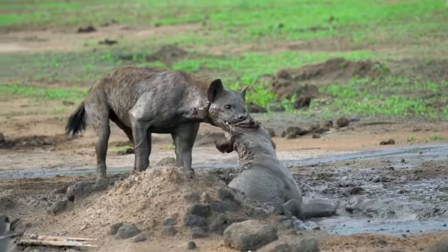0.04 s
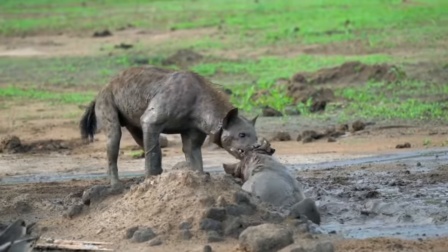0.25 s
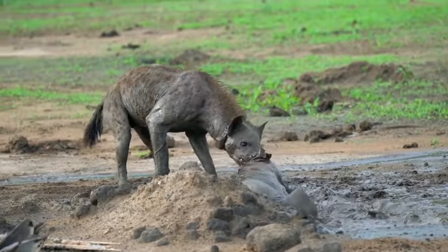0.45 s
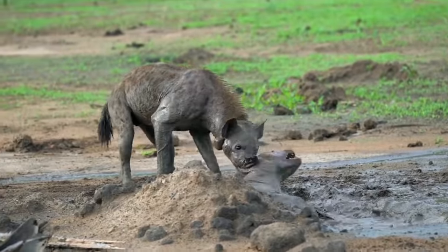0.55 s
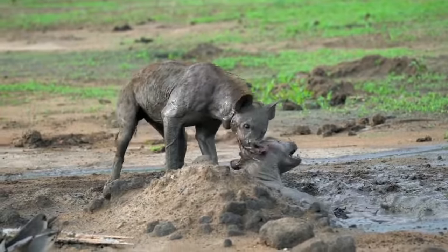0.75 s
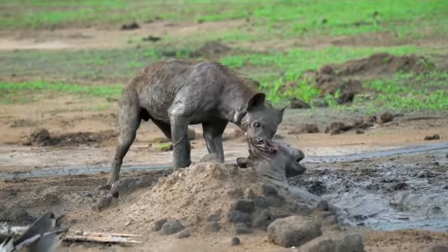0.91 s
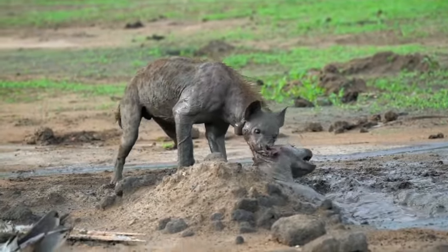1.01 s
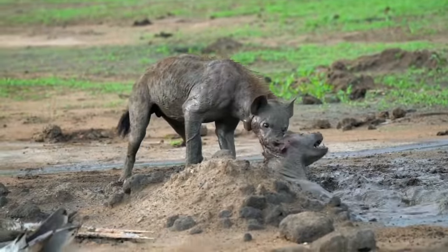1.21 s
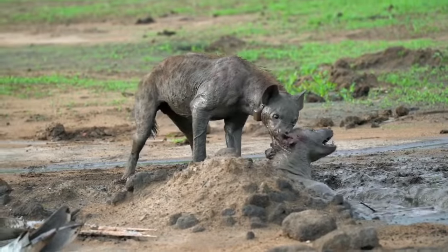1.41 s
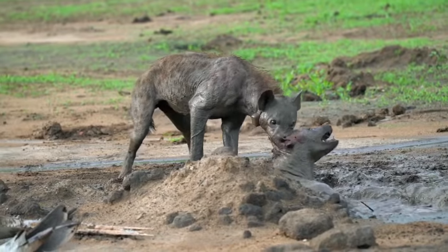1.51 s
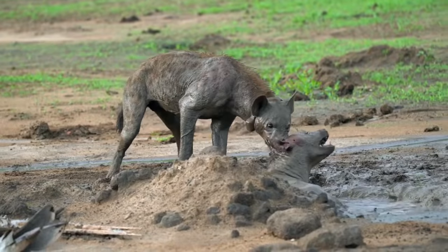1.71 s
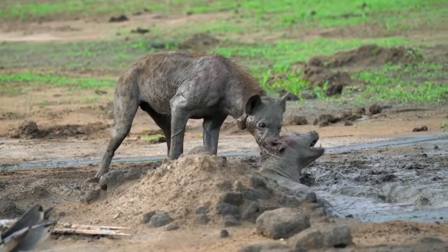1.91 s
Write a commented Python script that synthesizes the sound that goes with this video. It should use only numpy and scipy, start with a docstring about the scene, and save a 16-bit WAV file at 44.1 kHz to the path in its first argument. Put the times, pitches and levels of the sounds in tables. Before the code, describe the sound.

One low, raspy hyena moan outdoors, with soft mud squelches and faint bird chirps.

```python
"""A hyena groans as two fight in a mud wallow: a creak tightens into a snarl, drops an octave into a
full moan and sags into a rattle. Its vocal folds ring the chest, throat and mouth while breath rasps
between its teeth; a soft grunt follows. Mud squelches under them in swells of noise. A small bird
repeats a two-note chirp, another whistles far off, and insects hiss over the open ground."""
import sys
import numpy as np
from scipy import signal
from scipy.fft import rfft, irfft
from scipy.io import wavfile
from scipy.ndimage import uniform_filter1d

SR = 44100
rng = np.random.default_rng(int(sys.argv[2]) if len(sys.argv) > 2 else 0)


def put_to_file(sound):
    """Save the sound as 16-bit audio at rate SR, in the file named by the first command-line argument."""
    columns = np.atleast_2d(sound).T  # one column per channel
    safe = np.clip(columns, -1, 1)
    whole_steps = np.round(safe * 32767)
    wavfile.write(sys.argv[1], SR, whole_steps.astype(np.int16))


N = 85995
T = np.arange(N) / SR

# The groan's melody, as the rate of the folds' slow cycle: time_s, pitch_hz
GROAN_PITCH = [(.03, 55), (.15, 60), (.19, 74), (.268, 81.5), (.36, 88), (.428, 87.5), (.485, 90),
               (.52, 99), (.572, 112.5), (.635, 116.8), (.69, 113.4), (.836, 111.7), (.944, 117.3),
               (1.054, 118.5), (1.224, 115.1), (1.32, 109.5), (1.4, 90), (1.49, 68)]
def hyena(air_db=-36, rough_air_db=-9):
    """Fold closures and puffs of breath make one buzz that feeds both the voice and the rasp."""
    cycles = np.cumsum(curves(GROAN_PITCH)[0] * waver(.002)) / SR
    roughness = curves(FOLD_TEXTURE)[2]
    puffing = 1 + np.exp(-2 * (cycles % 1))
    breath, mid_air, side_air = unit_rms(puffing * rng.standard_normal((3, N)))
    buzz = steady(fold_closures(cycles)) + (amp(air_db) + amp(rough_air_db) * roughness) * breath
    buzz = signal.sosfilt(signal.butter(3, 185, "high", fs=SR, output="sos"), buzz)
    thrum = note(start_s=.52, length_s=.17, from_hz=110, to_hz=110, db=-44)  # under the octave drop
    voice = (vocal_tract(buzz) + creaks()) * gate(VOICE_LEVELS) + thrum
    return pan(voice, db=-.76) + pan(teeth_rasp(buzz, mid_air, side_air), db=-2.2)


# The grain of the voice: time_s, second_closure_gain, second_closure_place_cycles, roughness_ratio
FOLD_TEXTURE = [(.16, .7, .48, .9), (.19, 1, .5, .15), (.28, .9, .5, .15), (.3, .3, .5, .7),
                (.34, .25, .49, .15), (.47, .4, .5, .09), (.53, .2, .45, .25), (.6, .1, .4, .06),
                (1.22, .1, .4, .02), (1.31, .25, .35, .07), (1.39, .55, .33, .09), (1.45, .35, .4, .12),
                (1.5, .4, .45, .5)]
def fold_closures(cycles, jitter_s=.0009, shimmer_db=6, count=260):
    """The folds snap shut twice a cycle; when the second closure weakens, the voice drops an octave."""
    second_gain, place, roughness = curves(FOLD_TEXTURE)
    closures = [(cycles, np.ones(N)), (cycles - place, second_gain)]
    clicks = np.zeros(N)
    for phase, gain in closures:
        late, loud = rng.standard_normal((2, count))  # rough folds close unevenly in time and strength
        at = np.interp(np.arange(count), phase, np.arange(N))
        due = at.astype(int)
        at = np.clip(at + late * roughness[due] * jitter_s * SR, 0, N - 2)
        strength = gain[due] * amp(shimmer_db * roughness[due] * loud) * (due < N - 1)
        clicks += np.bincount(at.astype(int), strength * (1 - at % 1), N)  # split over two samples
        clicks += np.bincount(at.astype(int) + 1, strength * (at % 1), N)
    return clicks


# Fader rides for the three cavities: time_s, chest_db, throat_db, mouth_db
VOICE_LEVELS = [(.035, -52, -66, -58), (.05, -42, -55, -49.5), (.165, -41, -48.5, -44),
                (.195, -36, -39, -36), (.245, -36, -34.5, -37.5), (.28, -32.5, -31.5, -30),
                (.355, -31.5, -28, -27.5), (.42, -32.5, -23, -26), (.485, -36.5, -19.5, -25.5),
                (.55, -25, -27, -26), (.635, -24.5, -25, -18.5), (.69, -26.5, -31, -22.5),
                (.755, -28.5, -35, -19), (.825, -30, -39, -24.5), (.89, -28, -42, -25.5),
                (.945, -23.5, -26.5, -21), (1.02, -24.5, -23, -26.5), (1.14, -25.5, -21.5, -21),
                (1.22, -23.5, -30.5, -21), (1.37, -28, -30, -20), (1.44, -31.5, -37, -26),
                (1.495, -33.5, -38, -27), (1.52, -54, -44, -42)]
# The shifting vowel: time_s, chest_hz, lower_mouth_hz, upper_mouth_hz, upper_over_lower_db
VOWEL = [(.1, 266, 1055, 1210, 4), (.22, 232, 880, 1090, -2), (.44, 282, 1004, 1235, -1.5),
         (.56, 368, 875, 985, -9.5), (.6, 354, 934, 1256, 0.5), (.635, 337, 900, 1144, 4.5),
         (.73, 283, 983, 1270, -9.5), (.85, 207, 900, 1193, -1), (.95, 270, 1067, 1240, -1.5),
         (1.02, 280, 1185, 1310, -4.5), (1.12, 288, 1047, 1295, 2.5), (1.22, 288, 1017, 1285, -3),
         (1.3, 265, 932, 1192, -3), (1.485, 240, 821, 1000, 1.5)]
# The throat's ring: time_s, resonance_hz
THROAT_RING = [(.485, 705), (.515, 778), (.57, 753), (.63, 706)]
# High mouth resonances that give the voice its edge: centre_hz, width_hz, gain_db
EDGE_BANDS = [(1800, 200, 0), (2095, 170, -4)]
# Fader ride for that edge: time_s, level_db
EDGE_LEVEL = [(.15, -55.5), (.46, -40), (.58, -45.5), (.75, -40), (.85, -47.5), (1.05, -37.5), (1.25, -47),
              (1.5, -46)]
def vocal_tract(buzz):
    """The softened buzz rings the chest, throat and mouth, each riding its own fader."""
    drive = signal.lfilter(*signal.butter(2, 2960, fs=SR), buzz)
    chest_db, throat_db, mouth_db = curves(VOICE_LEVELS)
    chest_hz, lower_hz, upper_hz, upper_db = curves(VOWEL)
    chest = resonate(drive, chest_hz, width_hz=216)
    pharynx = amp(1) * resonate(chest, hz=470, width_hz=87)
    throat = resonate(drive, curves(THROAT_RING)[0], width_hz=81)
    mouth = steady(resonate(drive, lower_hz, width_hz=76))
    mouth += amp(upper_db) * steady(resonate(drive, upper_hz, width_hz=122))
    palate = amp(-13) * steady(resonate(drive, hz=1483, width_hz=102))
    edge = amp(curves(EDGE_LEVEL)[0]) * steady(bank(drive, EDGE_BANDS))
    return (amp(chest_db) * steady(chest + pharynx) + amp(throat_db) * steady(throat)
            + amp(mouth_db) * steady(mouth + palate) + edge)


# Dry snaps at both ends of the groan: start_s, peak_db
CREAK_HITS = [(.063, -30), (.144, -25), (.178, -23.5), (1.487, -19)]
def creaks():
    """Single snaps of the folds ring the mouth over a low thump."""
    mouth_hz = curves(VOWEL)[1]
    snaps = np.zeros(N)
    for start_s, peak_db in CREAK_HITS:
        click = 1. * (np.arange(N) == round(start_s * SR))
        snap = resonate(click, mouth_hz, width_hz=700) + resonate(click, hz=110, width_hz=216)
        snaps += amp(peak_db) * snap / abs(snap).max()
    return snaps


# Fader ride for the rasp: time_s, level_db
RASP_LEVEL = [(.1, -85), (.35, -54), (.58, -50), (.755, -41.5), (.83, -47.5), (1.05, -42.5), (1.36, -42),
              (1.43, -49.5), (1.53, -53)]
# The colour of the bared teeth: time_s, upper_over_lower_db, lower_hz
RASP_COLOUR = [(.58, -7.5, 5620), (.74, -18.5, 5350), (.84, -1, 5730), (1.07, -1.5, 5580), (1.27, -6, 5730)]
# The rasp's upper resonance: centre_hz, width_hz, gain_db
RASP_UPPER_BAND = [(7000, 860, 0)]
def teeth_rasp(buzz, mid_air, side_air, spread=.65):
    """Puffs of air and the folds' buzz rasp and whistle between the teeth."""
    upper_db, lower_hz = curves(RASP_COLOUR)
    air = mid_air + spread * np.array([side_air, -side_air])
    voiced_air = unit_rms(air + amp(-2) * buzz)
    lower = resonate(voiced_air, lower_hz, width_hz=485)
    upper = amp(upper_db) * bank(voiced_air, RASP_UPPER_BAND)
    sizzle = amp(-17.5) * resonate(air, hz=10700, width_hz=4500)
    return unit_rms(lower + upper + sizzle) * amp(curves(RASP_LEVEL)[0]) * gate(RASP_LEVEL)


def grunt(start_s=1.54, length_s=.15, hz=155, db=-48):
    """A short closed-mouth hum after the groan: a tone and its softer octave."""
    return note(start_s, length_s, hz, hz, db) + note(start_s, length_s, 2 * hz, 2 * hz, db - 7)


# Squelches under the fight: start_s, length_s, level_db
SQUELCH_HITS = [(0.64, 0.079, -41.5), (1.376, 0.051, -40.5), (1.512, 0.27, -48.5)]
# The mud's wet colour: frequency_hz, gain_db
MUD_EQ = [(300, 4), (1400, 6.5), (10000, -4.5), (15500, -7.5)]
def mud():
    """Wet mud squelches in short swells of noise."""
    swells = sum(amp(db) * np.sin(np.pi * np.clip((T - start_s) / length_s, 0, 1))
                 for start_s, length_s, db in SQUELCH_HITS)
    return swells * noise(MUD_EQ)


# Cues for each chirp's rising note: start_s
CHIRP_CUES = [.238, .567, .892, 1.218, 1.548]
def small_bird(lead_s=.027):
    """Each chirp is a faint falling note, then a rising one, with a fast flutter in level."""
    chirps = np.zeros(N)
    for start_s in CHIRP_CUES:
        chirps += note(start_s - lead_s, length_s=.014, from_hz=3500, to_hz=2750, db=-58.5)
        chirps += note(start_s, length_s=.026, from_hz=2850, to_hz=3850, db=-54.5)
    return chirps * waver(depth=1, size=150)


def far_bird():
    """One faint, steady whistle."""
    return note(start_s=1.76, length_s=.3, from_hz=1346, to_hz=1346, db=-57)


def insects(level_db=-54.5):
    """Insects merge into one high band of hiss."""
    return amp(level_db) * unit_rms(resonate(rng.standard_normal((2, N)), hz=5940, width_hz=1350))


# The colour of the open air: frequency_hz, gain_db
HUSH_EQ = [(25, -13), (90, 5), (220, 4.5), (780, 3.5), (2100, 2), (4200, -7), (7000, -11), (15500, -18.5)]
def hush(level_db=-48.5):
    """A low, even bed of outdoor noise."""
    return amp(level_db) * noise(HUSH_EQ)


def bank_reflections(x, t60_s=.05, size=4000, low_cut_hz=1300):
    """Early reflections from the wallow's banks, opposite in the two ears and thin in the bass."""
    tail = rng.standard_normal(size) * amp(-60 * T[:size] / t60_s)
    side = signal.fftconvolve(x.mean(0), tail / np.linalg.norm(tail))[:N]
    side = signal.lfilter(*signal.butter(1, low_cut_hz, "high", fs=SR), side)
    return np.array([side, -side])


# The outdoor tail, darkening as it fades: frequency_hz, t60_s
REVERB_DECAY = [(100, 0.64), (800, 0.61), (6000, 0.081)]
def reverb(x):
    """Diffuse reflections, each band dying at its own speed."""
    white = noise([(1, 0), (SR, 0)])[:, :SR]
    hz, t, bands = signal.stft(white, SR, nperseg=256)
    decay = amp(-60 * t / at_hz(REVERB_DECAY, hz)[:, None])
    tail = signal.istft(bands * decay, SR, nperseg=256)[1]
    return signal.fftconvolve(x, tail / np.linalg.norm(tail[0]), axes=1)[:, :N]


# How alike left and right are: frequency_hz, correlation_ratio
STEREO_LIKENESS = [(250, 0.99), (1000, 0.6), (2500, 0.06)]
def noise(eq):
    """Coloured stereo noise at rms 1, centred in the bass and wide in the treble."""
    hz = np.fft.rfftfreq(N, 1 / SR)
    left, other = rfft(rng.standard_normal((2, N)))
    likeness = at_hz(STEREO_LIKENESS, hz)
    right = likeness * left + np.sqrt(1 - likeness ** 2) * other
    return unit_rms(irfft(np.array([left, right]) * amp(at_hz(eq, hz)), N))


def note(start_s, length_s, from_hz, to_hz, db):
    """A soft-edged tone, held or gliding."""
    progress = np.clip((T - start_s) / length_s, 0, 1)
    hz = from_hz + (to_hz - from_hz) * progress ** .75
    envelope = np.sqrt(2 * abs(np.sin(np.pi * progress)))
    return amp(db) * envelope * np.sin(2 * np.pi * np.cumsum(hz) / SR)


def resonate(x, hz, width_hz):
    """A steep resonance of gain 1 that can sweep."""
    carrier = np.exp(2j * np.pi * np.cumsum(hz * np.ones(N)) / SR)
    pole = np.exp(-np.pi * width_hz / SR)
    baseband = signal.lfilter([(1 - pole) ** 2], [1, -2 * pole, pole * pole], x / carrier + 1e-18)
    return 2 * (carrier * baseband).real


def bank(x, bands):
    """Several resonances side by side."""
    return sum(amp(db) * resonate(x, hz, width_hz) for hz, width_hz, db in bands)


def waver(depth, size=1500):
    """A random drift about 1, smoothed over size samples."""
    return 1 + depth * unit_rms(signal.fftconvolve(rng.standard_normal(N), np.hanning(size), "same"))


def steady(x, size=1900):
    """A leveller that holds the running rms at 1."""
    window = np.hanning(size)
    power = abs(signal.fftconvolve(x ** 2, window / window.sum(), "same"))
    return x / np.sqrt(power + 1e-4 * np.mean(x ** 2))


def curves(table):
    """One automation lane for each column after time_s."""
    times, *columns = np.transpose(table)
    return [np.interp(T, times, column) for column in columns]


def gate(table, fade_s=.016):
    """Open from a table's first row to its last."""
    return np.clip(np.minimum(T - table[0][0], table[-1][0] - T) / fade_s + 1, 0, 1)


def at_hz(points, hz):
    """Reads a curve on a log-frequency axis."""
    point_hz, values = np.transpose(points)
    return np.interp(np.log(hz + 1), np.log(point_hz + 1), values)


def pan(x, db):
    """Places a sound by its left-minus-right level."""
    return x * amp([[db / 2], [-db / 2]])


def amp(db):
    """Decibels to gain."""
    return 10 ** (np.asarray(db) / 20)


def unit_rms(x):
    """Scales to rms 1."""
    return x / np.sqrt(np.mean(x ** 2) + 1e-20)


def scene():
    """The fight close and fairly dry, the birds wetter, insects and hush behind."""
    fight = hyena() + grunt() + mud()
    birds = np.tile(small_bird() + far_bird(), (2, 1))
    space = amp(-12) * bank_reflections(fight) + amp(-18) * reverb(fight) + amp(-6) * reverb(birds)
    return fight + birds + space + insects() + hush()


def record(dry, top_hz=15700):
    """A steep high cut on the whole mix."""
    high_cut = signal.firwin(511, top_hz, window=("kaiser", 9), fs=SR)
    return signal.oaconvolve(dry, high_cut[None], "same")


dry = scene()
out = record(dry)
put_to_file(out)
```